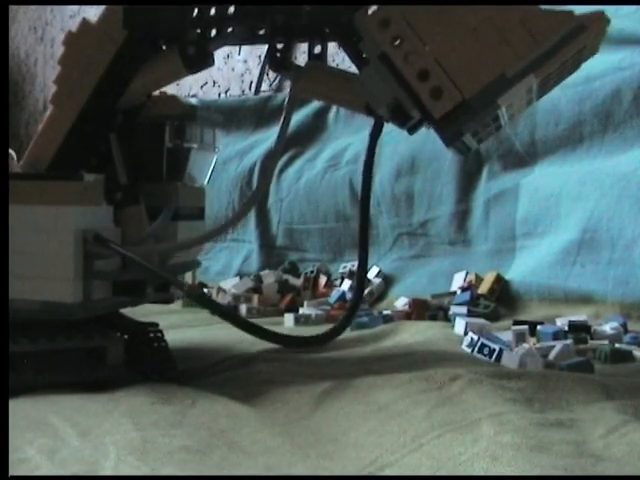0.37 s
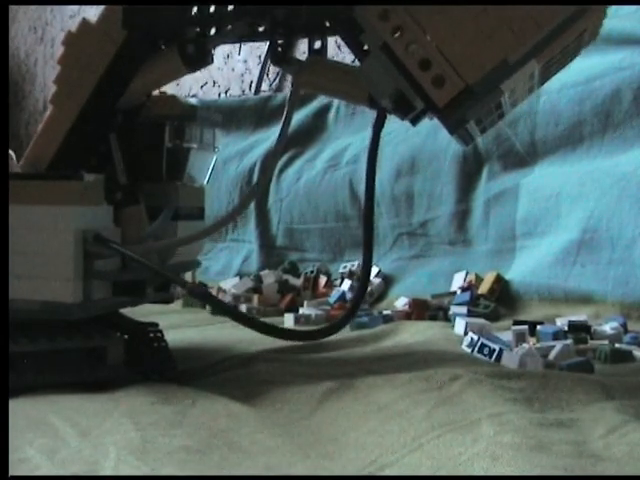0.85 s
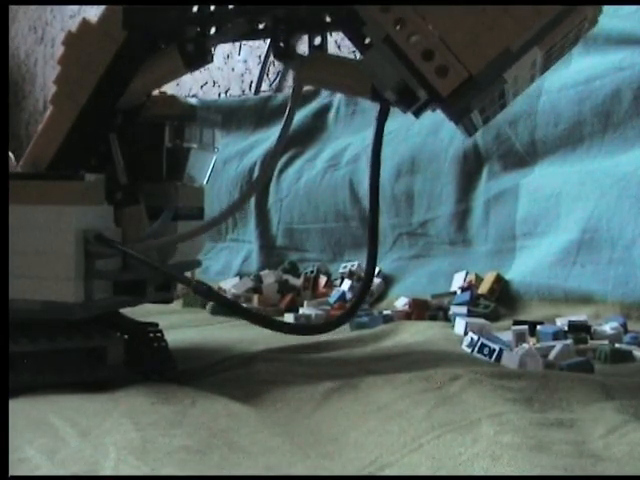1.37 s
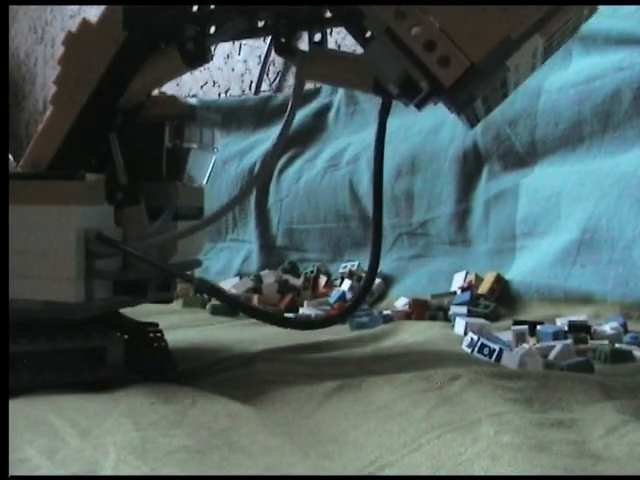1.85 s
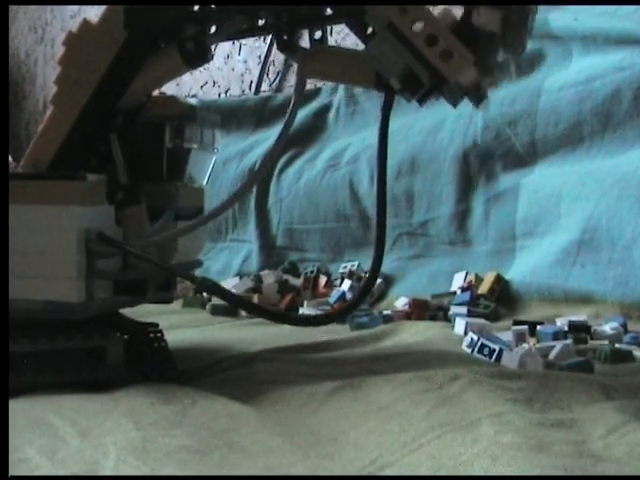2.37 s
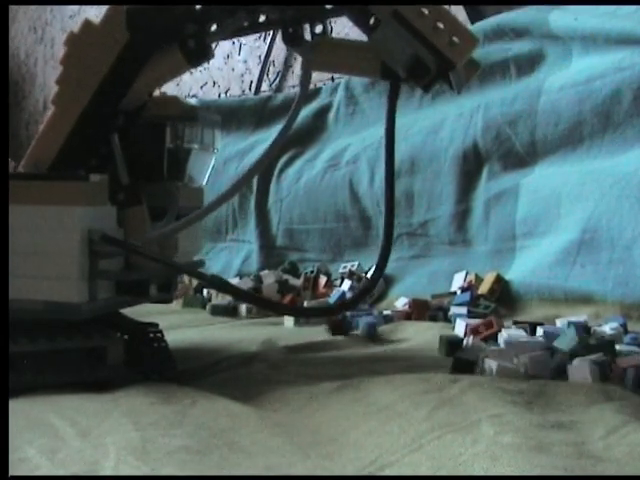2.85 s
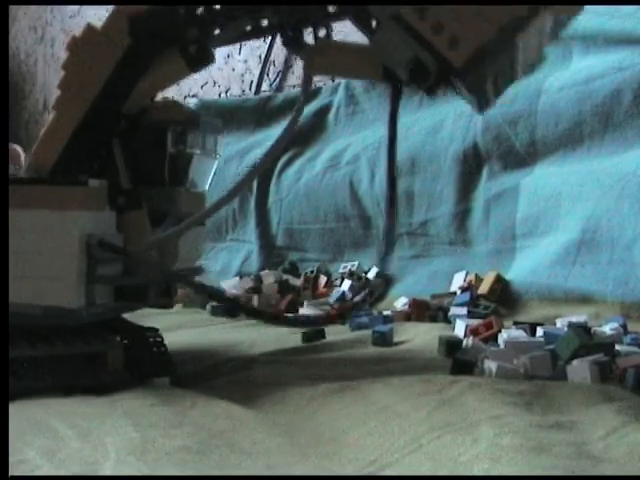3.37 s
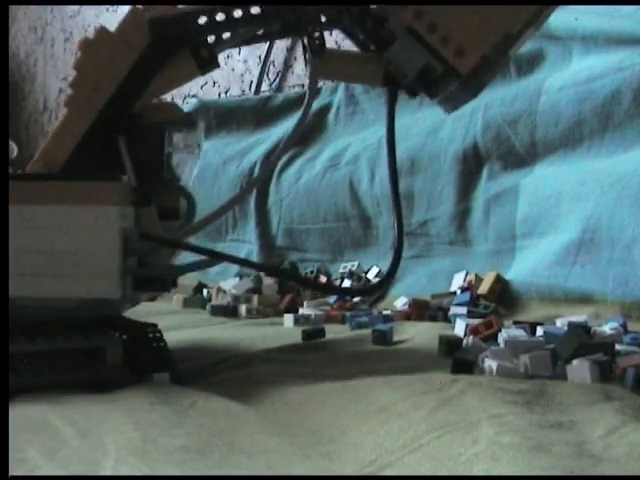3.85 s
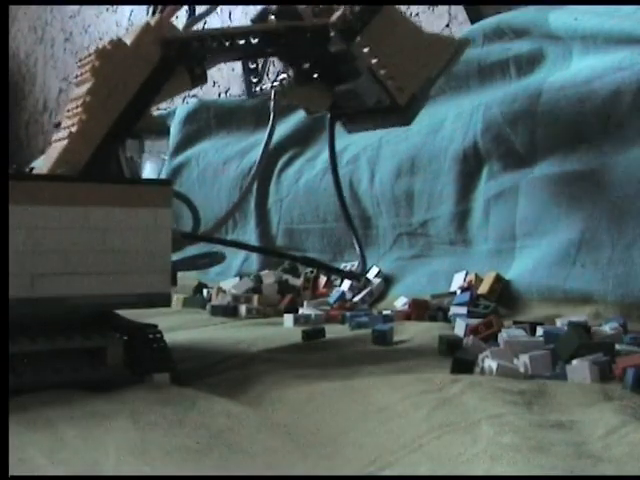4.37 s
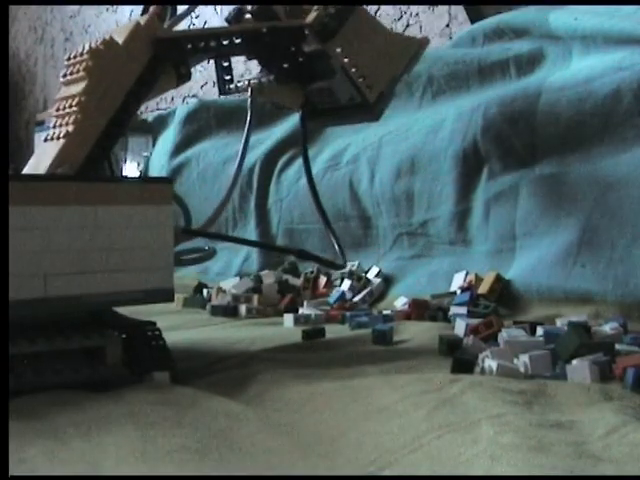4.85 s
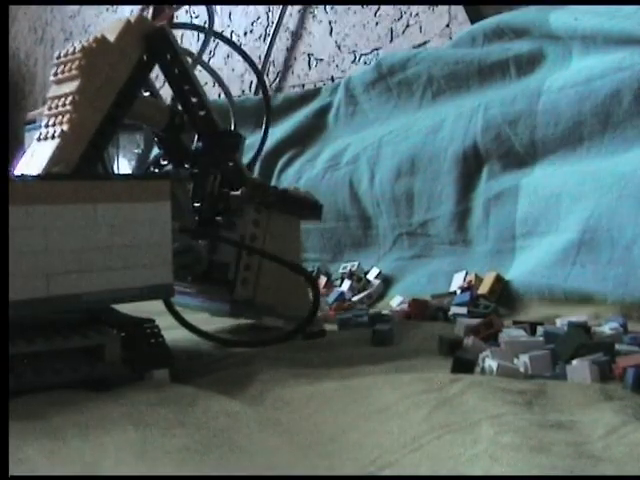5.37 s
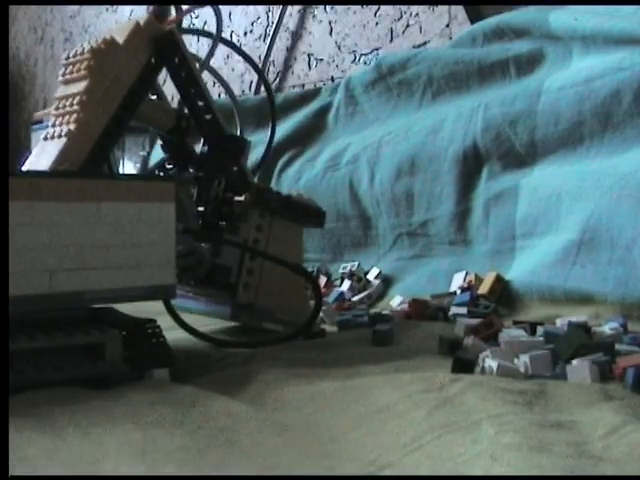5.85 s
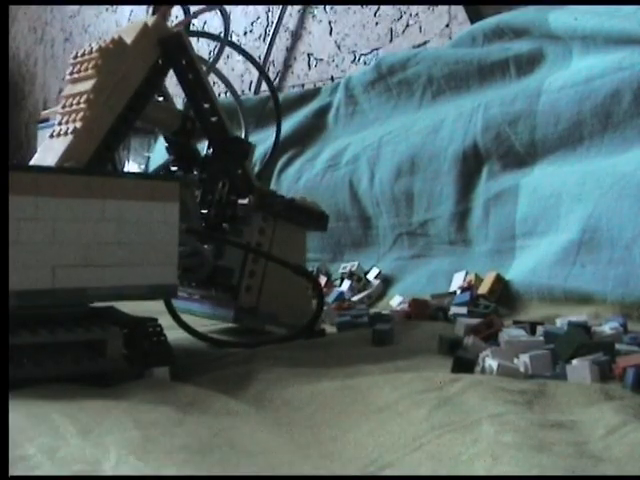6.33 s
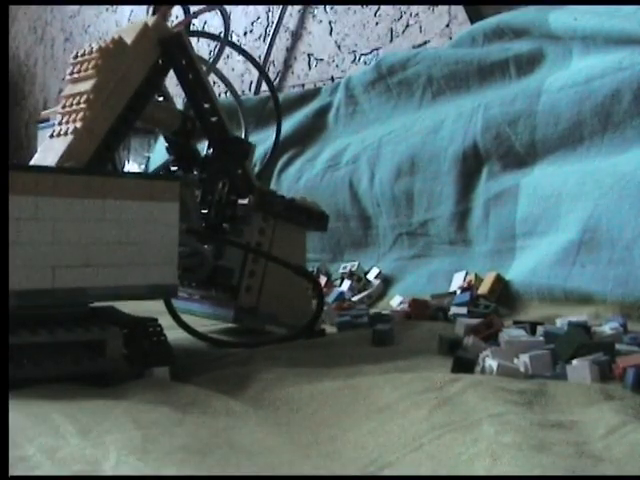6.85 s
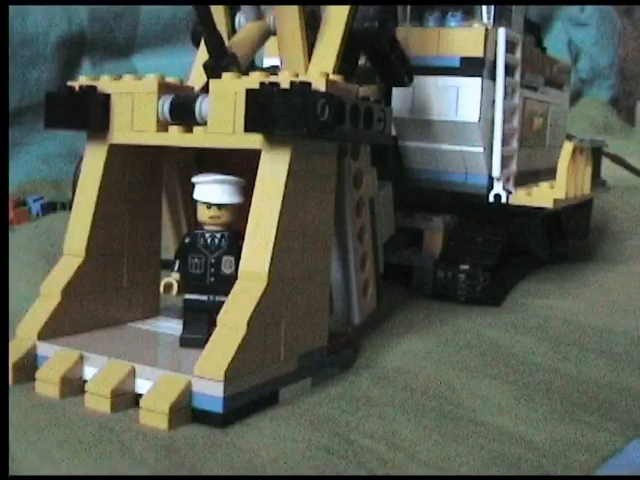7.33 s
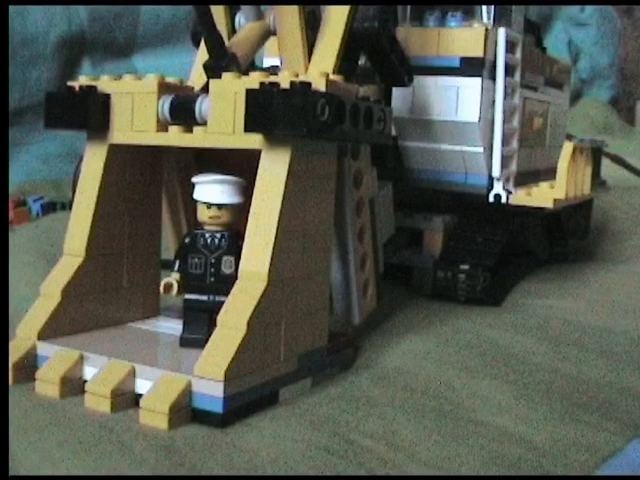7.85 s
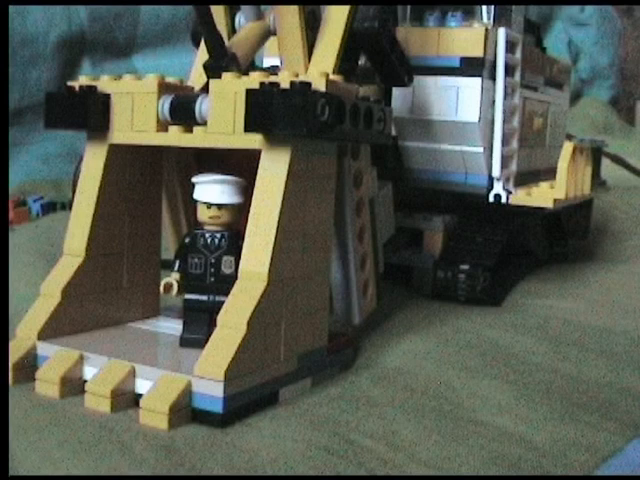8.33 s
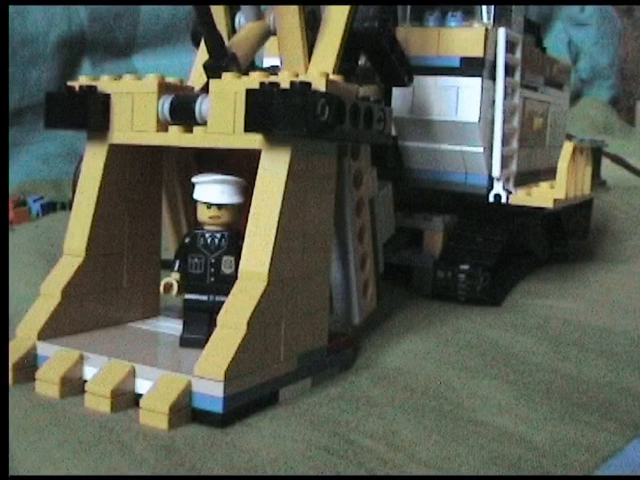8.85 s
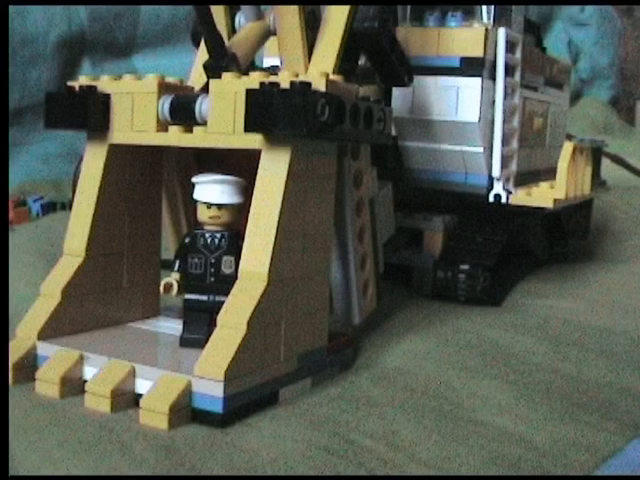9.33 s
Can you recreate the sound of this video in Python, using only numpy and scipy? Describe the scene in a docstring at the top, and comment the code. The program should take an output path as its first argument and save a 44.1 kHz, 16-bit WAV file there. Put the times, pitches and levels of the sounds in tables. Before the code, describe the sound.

Six tiny rhythmic pump squeaks come first over camcorder buzz, hiss and faint lens ticking. A loud spill of small hard plastic bricks bursts at the middle of the third second, dying fast. A sharp clack follows, later a valve hiss and a cluster of duller knocks with low thuds. The close stereo microphone hears a dry small room; the end is hum, hiss and brief mutes.

```python
"""On a blanket in a small furnished room, a toy digger and plastic bricks, close to a tape camcorder's stereo microphone.
Behind lie coloured transport hiss and the whine of the head drum, a row of multiples of its speed, reaching the
microphone directly with lens motor ticks and knocks; brief soft high pips are mixed in dry. A hand pump squeals and
puffs, valves hiss in noise; bricks pour and the arm snaps, as pushes that ring plastic modes, over low ground thuds.
Lost tape frames mute the sound briefly near 7.5 and 8 s, and thin treble flickers around them."""
import sys
import numpy as np
from scipy import signal
from scipy.fft import rfft, irfft
from scipy.io import wavfile
from scipy.ndimage import uniform_filter1d

SR = 44100
rng = np.random.default_rng(int(sys.argv[2]) if len(sys.argv) > 2 else 0)


def to_linear_factor(level_db):
    """Convert decibel levels (scalar or array-like) to linear amplitude factors."""
    exponent = np.asarray(level_db, float) / 20
    return 10 ** exponent


def transcribe(u):
    """Save the signal u as a 16-bit wav file named by the first command-line argument.

    u: samples, shape (n,) or (channels, n), limited to [-1, 1]; the rate is SR.
    q: integer samples, one column per channel.
    """
    v = np.clip(np.atleast_2d(u).T, -1, 1)
    q = np.round(v * 32767).astype(np.int16)
    wavfile.write(sys.argv[1], SR, q)


N = 417186
T = np.arange(N) / SR  # s
DRUM_HZ = 149.99  # turns per second; two heads, so two slaps a turn


def band(x, lo_hz, hi_hz, order=2):
    """Butterworth band-pass."""
    edges_hz = [lo_hz, min(hi_hz, .45 * SR)]
    return signal.sosfilt(signal.butter(order, edges_hz, "band", fs=SR, output="sos"), x)


def unit(x):
    """Scale to rms 1."""
    return x / np.sqrt(np.mean(x ** 2))


def sides(pan_db):
    """Left and right gains as a column, from the left minus right level."""
    return to_linear_factor(np.array([[pan_db / 2], [-pan_db / 2]]))


def add(out, sound, s):
    """Mix a sound in, starting at time s."""
    i = int(s * SR)
    out[..., i:i + sound.shape[-1]] += sound[..., :N - i]


def ring(x, hz, t60):
    """One exponentially decaying mode driven by x: a complex one-pole resonator."""
    pole = np.exp(2j * np.pi * hz / SR - np.log(1000) / (t60 * SR))
    return signal.lfilter([1], [1, -pole], x).imag


def curve(rows, column, off_db=-120):
    """Gain over time from a dB column, at off_db outside the rows."""
    rows = np.array(rows)
    return to_linear_factor(np.interp(T, rows[:, 0], rows[:, column], off_db, off_db))


def hiss():
    """Transport and room noise, mostly shared by both ports; above 1 kHz it swells at the head slap rate."""
    # noise spectrum before scaling to the overall level: (f/Hz, relative level/dB per Hz)
    colour = [(12, -34), (20, -5.5), (145, -6), (242, -9.5), (301, -10.5), (354, -9), (592, -14),
              (819, -15), (1200, -18), (1610, -18), (1800, -19), (1950, -16.5), (5610, -27.5),
              (11700, -34.5), (13000, -59)]
    # stereo lean of the noise: (f/Hz, left minus right level/dB)
    lean = [(60, 0), (110, 0), (200, 4), (380, 4), (700, 1), (1290, 11.5), (2380, 0), (4400, 0),
            (8120, -0.5), (15000, 0)]
    hz = np.fft.rfftfreq(N, 1 / SR) + 1  # + 1 keeps the logarithm finite
    colour_hz, colour_db = np.transpose(colour)
    lean_hz, lean_db = np.transpose(lean)
    hollow_db = 13 * np.exp(-((hz - 830) / 60) ** 2)
    shape = to_linear_factor(np.interp(np.log(hz), np.log(colour_hz), colour_db) - hollow_db)
    pan = np.interp(np.log(hz), np.log(lean_hz), lean_db)
    mid, side = rfft(rng.standard_normal((2, N))) * shape
    # the ports differ more towards the treble
    side = side * np.interp(np.log(hz), np.log([60, 1000, 5000, 12000]), [.3, .35, .4, .7])
    pair = np.array([(mid + side) * to_linear_factor(pan / 2), (mid - side) * to_linear_factor(-pan / 2)])
    low = irfft(pair * (hz < 1000), N)
    high = irfft(pair * (hz >= 1000), N)
    swell = 1 + 0.14 * np.cos(4 * np.pi * DRUM_HZ * T)
    return to_linear_factor(-57) * unit(low + high * swell)


def drum():
    """Two heads slap the tape each turn: a buzz of multiples, each wavering a little; the right port hears it first."""
    # one row per multiple of the drum speed, at first and then from 6.87 s on:
    # (level/dB, left minus right level/dB, later level/dB, later left minus right level/dB)
    multiples = [(-64, 4, -64, 4), (-56, 5, -54, 5), (-76, 4, -79, 1), (-69, 7, -71, 6), (-81, 0, -81, 0),
                 (-73, 1, -73, -1), (-82, -3, -82, -2), (-61, -3, -64, 7), (-71, 6, -69, 5),
                 (-63, 5, -65, 8), (-85, 1, -83, -2), (-65, 4, -65, 2), (-85, 6, -88, 0), (-70, 0, -70, 1),
                 (-85, 2, -85, 0), (-72, 1, -75, -1), (-80, 3, -72, 4), (-70, 2, -67, 1), (-83, 2, -82, 1),
                 (-69, 5, -69, 4), (-81, 1, -82, 2), (-71, 2, -71, 1), (-87, 2, -86, 1), (-75, 2, -77, 1),
                 (-103, 0, -105, -1), (-80, 4, -84, 4), (-92, -3, -81, -1), (-80, -3, -76, -3),
                 (-98, 1, -97, -1), (-76, -2, -73, -1), (-98, 0, -100, -2), (-80, -2, -77, -2),
                 (-93, 1, -96, -1), (-78, 2, -77, 2), (-94, 1, -97, 0), (-72, -1, -72, 0),
                 (-91, 1, -92, -2), (-76, 0, -76, 1), (-88, -1, -85, -1), (-76, -1, -77, -1),
                 (-98, 0, -99, -2), (-76, 0, -77, 0)]
    out, late = np.zeros((2, N)), T > 6.87
    for k, (db1, pan1, db2, pan2) in enumerate(multiples, 1):
        if max(db1, db2) < -87:  # too faint to count
            continue
        waver = np.interp(T, np.linspace(0, T[-1], 200), rng.standard_normal(200))
        db = np.where(late, db2, db1) + 0.71 * waver
        pan = np.where(late, pan2, pan1)
        # the slap rings through the housing, so higher multiples come later
        phase = 2 * np.pi * k * DRUM_HZ * T - .045 * k ** 2
        # the two heads differ in timing more than in strength: odd multiples turn a quarter
        phase += np.pi / 2 * (k % 2)
        out[0] += to_linear_factor(db + pan / 2) * np.sqrt(2) * np.cos(phase - k * 0.019)
        out[1] += to_linear_factor(db - pan / 2) * np.sqrt(2) * np.cos(phase)
    return out


def flicker():
    """Thin treble noise in two bands, buzzing at the head slap rate, flickers around the lost tape frames."""
    # bursts of treble: (from t/s, to t/s, relative level/dB)
    bursts = [(7.312, 7.385, -74.5), (7.828, 7.874, -66), (7.907, 7.95, -65), (8.03, 8.236, -74.5),
              (8.267, 8.425, -77)]
    noise = rng.standard_normal((2, N))
    narrow = unit(band(noise, 10380, 10710, order=3))
    wide = unit(band(noise, 6900, 12400, order=8))
    buzz = 1 + 0.5 * np.cos(4 * np.pi * DRUM_HZ * T)
    fade_s = 0.0069
    gain = sum(to_linear_factor(db) * np.clip(np.minimum(T - a, b - T) / fade_s, 0, 1) for a, b, db in bursts)
    return (narrow + 1.5 * wide) * buzz * gain


def lens_motor():
    """Each motor step ticks into a small housing, never quite alike; a weaker latch tick comes 17 ms ahead."""
    # motor runs: (first step t/s, last step limit t/s, step period/s)
    runs = [(1.5717, 2.78, .04), (2.792, 4.18, .06), (4.732, 5.5, .04), (5.532, 5.96, .06),
            (6.072, 6.44, .06)]
    out = np.zeros(N)
    at = np.concatenate([np.arange(*run) for run in runs])
    for s, chance in zip(at, rng.standard_normal((len(at), 4))):
        step = (0, -47 + 1.5 * chance[0], chance[1])
        latch = (.017, -54 + 3 * chance[2], chance[3])
        for ahead_s, db, detune in (step, latch):
            tap = np.hanning(7) / 3
            push = np.r_[tap, np.zeros(40), .4 * detune * tap, np.zeros(900)]  # a second, uneven tap follows
            tick = ring(push, 2330 * (1 + 0.043 * detune), 0.022)
            tick = tick + .5 * ring(push, 1950, 0.0058) + 0.392 * ring(push, 3100, 0.011)
            add(out, to_linear_factor(db) * tick, s - ahead_s)
    return out


def camera_knocks():
    """Dull knocks inside the camera: a soft push rings one short mode."""
    # knocks: (t/s, drive level/dB, f/Hz)
    knocks = [(1.099, -43.5, 314), (1.555, -41.5, 740), (3.57, -47.5, 760), (4.53, -44, 810),
              (4.83, -41, 1070), (5.57, -51, 696), (6.53, -45, 850)]
    out = np.zeros(N)
    push = np.r_[np.hanning(24) / 12, np.zeros(3000)]
    for s, db, hz in knocks:
        add(out, to_linear_factor(db) * ring(push, hz, 0.043), s)
    return out


def pips():
    """Brief soft pips and one low hoot: sines under bell-shaped swells."""
    # high pips: (t/s, f/Hz)
    high_pips = [(1.284, 6170), (1.908, 6470), (2.048, 5650), (3.0, 6040), (4.372, 6270), (5.07, 5600),
                 (5.438, 5550), (5.848, 6020), (9.242, 6010)]
    # the low hoot: (t/s, half length/s, f/Hz, peak level/dB)
    hoot = [(8.757, .038, 487, -55.5)]
    out = np.zeros(N)
    for s, half_s, hz, db in [(s, 0.0047, hz, -52.5) for s, hz in high_pips] + hoot:
        out += to_linear_factor(db) * np.exp(-((T - s) / half_s) ** 2) * np.sin(2 * np.pi * hz * T)
    return out


def thuds():
    """Blanket and floor rumble under falling and rocking weight: two bands of low noise, the deepest part late."""
    # thuds: (t/s, level below 90 Hz/dB, level above 90 Hz/dB, t60/s)
    weights = [(2.385, -56, -60, .3), (2.47, -53, -45.5, 0.57), (2.57, -47.5, -49, 0.32),
               (2.66, -57, -60, 0.56), (3.274, -46, -43.5, 0.14), (3.4, -58, -60.5, 0.18),
               (4.399, -64, -51, 0.32), (4.448, -59, -54, .3), (5.0, -50.5, -66, .2),
               (5.115, -41.5, -43.5, 0.35), (5.37, -63, -55.5, .3)]
    rise_s, deep_lag_s = 0.0186, 0.039
    deep = unit(band(rng.standard_normal(N), 46, 83))
    upper = unit(band(rng.standard_normal(N), 90, 234))

    def swell(s, db, t60):
        """Bell-shaped rise up to s, then exponential decay."""
        rise = np.exp(-(np.minimum(T - s, 0) / rise_s) ** 2)
        return rise * to_linear_factor(db - 60 * np.maximum(T - s, 0) / t60)

    out = np.zeros(N)
    for s, deep_db, upper_db, t60 in weights:
        out += deep * swell(s + deep_lag_s, deep_db, t60)
        out += upper * swell(s, upper_db, t60)
    return out


def add_puff(out, s, rise, fall, db, hz):
    """Escaping air, strongest at s: bright noise with a soft whistle, a narrow band of the same noise round hz."""
    t = np.arange(-3 * rise, 5 * fall, 1 / SR)
    mid, side = rng.standard_normal((2, len(t)))
    noise = mid + 0.2 * side * np.array([[1], [-1]])
    air = unit(band(noise, 6200, 12800, order=5)) + 0.45 * unit(band(noise, .91 * hz, 1.1 * hz))
    envelope = np.where(t < 0, np.exp(-(t / rise) ** 2), np.exp(-t / fall))
    add(out, to_linear_factor(db) * air * envelope, s - 3 * rise)


def pump():
    """The piston squeals with overtones, clicks and puffs partway, breaks off briefly and resumes; valves only hiss."""
    # pump strokes: (start t/s, length/s, first pitch f/Hz, squeal level/dB)
    strokes = [(0.143, 0.026, 2340, -47), (.54, 0.036, 2330, -47.5), (.915, 0.027, 2340, -48),
               (1.392, 0.041, 2260, -49.5), (1.835, 0.034, 2320, -59), (2.242, 0.028, 2350, -62)]
    # air let go as the piston is drawn back: (peak t/s, level/dB)
    returns = [(.337, -68.5), (.74, -68.5), (1.125, -73), (1.21, -75), (1.585, -67.5), (2.035, -69)]
    # valves thrown: (peak t/s, fall time/s, level/dB)
    valves = [(3.196, 0.0088, -44), (4.891, .02, -43)]
    top_hz, pump_whistle_hz, valve_whistle_hz = 2515, 9500, 4050
    pump_fall_s = .024
    overtones_db = [1.5, -12, -14, -17.5, -21]
    out = np.zeros((2, N))
    for s, length, first_hz, db in strokes:
        u = np.arange(int(length * SR)) / (length * SR)  # 0 to 1 through the squeal
        hz = first_hz + (top_hz - first_hz) * np.sqrt(u) + 250 * rng.standard_normal(len(u))
        phase = 2 * np.pi * np.cumsum(hz) / SR
        tone = sum(to_linear_factor(over_db) * np.sin(k * phase) for k, over_db in enumerate(overtones_db, 1))
        broken = 1 - np.exp(-((u - .6) / .1) ** 2)
        add(out, to_linear_factor(db) * tone * np.sqrt(np.sin(np.pi * u)) * broken, s)
        click_s = s + .42 * length  # click and air peak fall inside the squeal
        click = band(np.r_[np.hanning(9), np.zeros(800)], 105, 2020)
        add(out, -to_linear_factor(-20.5) * click, click_s)
        add_puff(out, click_s, .015, pump_fall_s, -71, pump_whistle_hz)
    for s, db in returns:
        add_puff(out, s, 0.0055, pump_fall_s, db, pump_whistle_hz)
    for s, fall, db in valves:
        add_puff(out, s, .019, fall, db, valve_whistle_hz)
    return out


def struck(push):
    """Plastic answers a push: the bare crack plus its modes, newly detuned each time, in four registers."""
    # what the plastic rings with: (f/Hz, relative level/dB, t60/s)
    plastic = [(760, -19.5, .03), (1117, 0, 0.047), (1302, -2, 0.06), (1638, 13.5, 0.012),
               (1910, 8.5, 0.01), (2350, 17, 0.0033), (2980, -7.5, 0.013), (3690, 6, 0.0063),
               (3980, 9.5, 0.00719), (4630, 6.5, 0.0047), (5190, 6, 0.0055), (5730, 3.5, 0.011),
               (6603, -24, 0.0052), (7030, -3.5, 0.0082), (7700, 3.5, 0.02), (8540, -3.5, 0.0098),
               (8760, -10.5, 0.006), (9840, 3.5, 0.01), (10600, -11.5, 0.011), (11915, -6.5, .006)]
    # hollow knock, clack, small brick, bright edge: (from f/Hz, to f/Hz)
    registers = [(600, 2500), (2500, 6000), (6000, 9000), (9000, 14000)]
    chance = rng.standard_normal((len(plastic), 2))
    modes = 0
    for (hz, db, t60), (size, shift) in zip(plastic, chance):
        modes = modes + to_linear_factor(db + 2 * size) * ring(push, hz * (1 + .035 * shift), t60)
    cracks = (.4, .8, 1.2, 1.3)  # share of bare crack in each register
    return [band(crack * push + 0.019 * modes, *edges, order=3) for crack, edges in zip(cracks, registers)]


def pour():
    """Loose bricks tumble over each other in six streams: dense clicks of unequal size, spread left to right."""
    # the pour, then the drag of the arm: rows of (t/s, small brick level/dB, share of big pieces/dB)
    rattles = [
        [(2.2, -69.5, 15), (2.33, -60.5, 12), (2.42, -48, 3), (2.5, -35, -3.5), (2.57, -31, -10),
         (2.7, -51, -7), (2.81, -75, 10), (2.88, -74, 3)],
        [(4.78, -84, 5), (4.84, -76.5, 13), (4.9, -73, 17), (5.02, -74, 9), (5.1, -71.5, 11), (5.19, -75, 15),
         (5.3, -84, 5)],
    ]
    # hollow knock against clack, in the pour and in the drag: (level/dB, level/dB)
    hollow_share = (-14, 1.5)
    clicks_per_s = 900
    out = np.zeros((2, N))
    for rows, hollow_db in zip(rattles, hollow_share):
        span = slice(int(rows[0][0] * SR), int(rows[-1][0] * SR))
        count = span.stop - span.start
        level, big = (curve(rows, column)[span] for column in (1, 2))
        for pan_db in (-0.5, -3, -0.5, -2.0, -2.0, 1.5):
            landing = rng.random(count) < clicks_per_s / SR
            strength = rng.standard_normal(count) * to_linear_factor(3 * np.minimum(rng.exponential(size=count), 3.5))
            low, mid, high, edge = struck(landing * strength)
            small_bricks = 1.6 * unit(high) + 0.89 * unit(edge)
            big_pieces = unit(mid) + to_linear_factor(hollow_db) * unit(low)
            out[:, span] += sides(pan_db) * level * (small_bricks + big * big_pieces)
    return out / np.sqrt(6)


def blow(db, tilt_db, chatter_db, t60, registers_db):
    """One hit: the contact builds for a moment, snaps, then uneven chatter dies away."""
    t = np.arange(-.002, .16, 1 / SR)
    grit = rng.standard_normal(len(t)) * rng.exponential(size=len(t))
    grit = uniform_filter1d(grit, size=2)  # chatter is softer contact, so duller
    snap = np.exp(-np.abs(t) / 0.00023) * rng.standard_normal(len(t))
    chatter = grit * np.where(t < 0, np.exp(t / 0.0021), to_linear_factor(-60 * t / t60))
    parts = struck(snap + to_linear_factor(chatter_db) * chatter)
    sound = 0
    for k, (register_db, part) in enumerate(zip(registers_db, parts)):
        sound = sound + to_linear_factor(register_db + k * tilt_db) * part / np.abs(part).max()
    pan_db = .8 + 0.908 * rng.standard_normal()
    return sides(pan_db) * to_linear_factor(db) * sound / np.abs(sound).max()


def brick_blows():
    """Bricks land on the heap; small bricks tilt towards the treble, big ones towards the hollow knock."""
    # landings: (t/s, peak level/dB, tilt per register/dB, chatter level/dB)
    landings = [(2.172, -30, 2.5, -19.5), (2.179, -22.5, -7, -19), (2.212, -25.5, 2.5, -19),
                (2.245, -29, -1, -18.5), (2.268, -25, -6, -14), (2.295, -23.5, 0.5, -16),
                (2.304, -21.5, -2.5, -12.5), (2.323, -24, -4.5, -12.5), (2.354, -11, 1.5, -9.5),
                (2.363, -14.5, -2.5, -12), (2.391, -11, -1.5, -16), (2.401, -20.5, 1, -17.5),
                (2.411, -19, 2, -16.5), (2.419, -4, -2, -24), (2.426, -12, 1, -19), (2.452, -8, -2.5, -2.5),
                (2.473, -10.5, 4, -14), (2.5, -5.5, -1.5, -12.5), (2.512, -15.5, 5, -16),
                (2.527, -8, 6, -13.5), (2.537, -16, 5.5, -20), (2.548, -13.5, 6, -16),
                (2.568, -13.5, 4, -14.5), (2.596, -12, 1, -16), (2.65, -24, 3.5, -16),
                (2.669, -26, 3.5, -16.5), (2.697, -25.5, 3.5, -15.5), (2.772, -40, -14, -13),
                (2.809, -31.5, -1, -19.5), (2.893, -48, 1, -20)]
    registers_db = (-21.5, -3, 2, -4.5)  # hollow knock, clack, small brick, bright edge
    out = np.zeros((2, N))
    for s, *row in landings:
        add(out, blow(*row, 0.0574, registers_db), s - .0008)  # chatter t60 in s; snap 1.2 ms after s
    return out


def arm_blows():
    """Arm and bucket knock against their stops, each with its own length of chatter."""
    # knocks: (t/s, peak level/dB, tilt per register/dB, chatter level/dB, chatter t60/s)
    stops = [(3.232, -28.5, -8, -17, 0.036), (3.263, -12, 4, -7, 0.025), (3.2663, 0, 0, -28, 0.083),
             (3.272, -14, 1.5, -29, 0.07), (3.279, -29, 0, -20, .07), (3.288, -29.5, -6, -15, 0.15),
             (4.174, -33.5, -6.5, -16.5, 0.048), (4.914, -29, -2.5, -10, 0.04), (4.963, -39, 2, -9, .06),
             (5.043, -43, 1, -12, .07), (5.097, -20.5, 1, -5, 0.05), (5.102, -16.5, -9, -2, 0.024),
             (5.106, -19.5, -5, -9, 0.035), (5.115, -22.5, -6, -13.5, 0.054), (5.126, -31, -8, -10, 0.086),
             (5.148, -27.5, 2, -15, 0.059), (5.169, -29, -2, -14.5, 0.049), (5.218, -42, -4, -12, .07),
             (5.324, -24, 7, -18.5, 0.072), (5.338, -28.5, 9.5, -10.5, 0.091), (5.932, -27, -9, -6, 0.052),
             (5.949, -41, -5, -12, .06)]
    registers_db = (1.5, 5.5, 2.5, -1)  # hollow knock, clack, small brick, bright edge
    out = np.zeros((2, N))
    for s, *row in stops:
        add(out, blow(*row, registers_db), s - .0008)
    return out


def stiff_part():
    """One stiff part sings on when hit: a burst of noise rings close modes near 10 kHz."""
    # modes of the part: (f/Hz, relative level/dB, t60/s)
    modes = [(9970, -9.5, .07), (10100, -2, 0.11), (10140, -5, 0.077), (10060, 0, 0.074),
             (10240, -5, 0.062)]
    # hits: (t/s, peak level/dB)
    hits = [(2.27, -39), (2.42, -11), (2.528, -10.5), (2.549, -17), (2.57, -14), (2.596, -23), (2.65, -29),
            (2.696, -48), (2.801, -47), (5.136, -46.5), (5.163, -48), (5.327, -24.5), (5.34, -28)]
    out, t = np.zeros((2, N)), np.arange(-.002, .16, 1 / SR)
    for s, db in hits:
        push = np.exp(-np.abs(t) / 0.001683) * rng.standard_normal(len(t))
        song = sum(to_linear_factor(mode_db) * ring(push, hz, t60) for hz, mode_db, t60 in modes)
        song = band(song, 10000, 11500)
        add(out, sides(2.5) * to_linear_factor(db) * song / np.abs(song).max(), s - .002)
    return out


def room(x, t60=.22, wet_db=-14):
    """A small furnished room: a short noise tail in two bands, duller as it fades."""
    t = np.arange(SR // 2) / SR
    noise = rng.standard_normal((2, len(t))) * (t > .003)
    mostly_shared = noise[0] + 0.14 * noise[1] * np.array([[1], [-1]])
    tail = band(mostly_shared, 270, 4000) * to_linear_factor(-60 * t / t60)
    tail = tail + 2.2 * band(noise, 4000, 11540, order=3) * to_linear_factor(-60 * t / (0.79 * t60))
    tail = tail / np.sqrt(np.sum(tail[0] ** 2))
    return x + to_linear_factor(wet_db) * signal.fftconvolve(x.mean(0)[None], tail, axes=1)[:, :N]


def scene():
    """The toy in the room, 10 microseconds late at the left port; camera noises and pips are added without room."""
    toy = brick_blows() + arm_blows() + stiff_part() + pour() + pump()
    delay = np.exp(-2j * np.pi * np.fft.rfftfreq(N, 1 / SR) * .00001)
    toy[0] = irfft(rfft(toy[0]) * delay, N)
    camera = lens_motor() + camera_knocks() + drum() + hiss()
    return room(toy) + thuds() + camera + pips() + flicker()


def band_limit(x):
    """A steep low-pass at the top of the band."""
    return signal.sosfilt(signal.butter(12, 16810, fs=SR, output="sos"), x)


def record(dry):
    """Peaks are rounded, the housing takes a notch out near 3.8 kHz, the top rolls off; lost tape frames are muted."""
    # lost frames: (from t/s, to t/s)
    lost_frames = [(7.473, 7.513), (7.8715, 7.9115), (7.9515, 8.0315)]
    x = signal.lfilter(*signal.iirnotch(3780, 22, SR), np.tanh(dry))
    x = signal.sosfilt(signal.butter(10, 15600, fs=SR, output="sos"), x)
    for a, b in lost_frames:
        x = x * np.clip(np.maximum(a - T, T - b) / 0.0008, 0, 1)  # 0.8 ms fades
    return band_limit(x)


dry = scene()
out = record(dry)
transcribe(out)
```